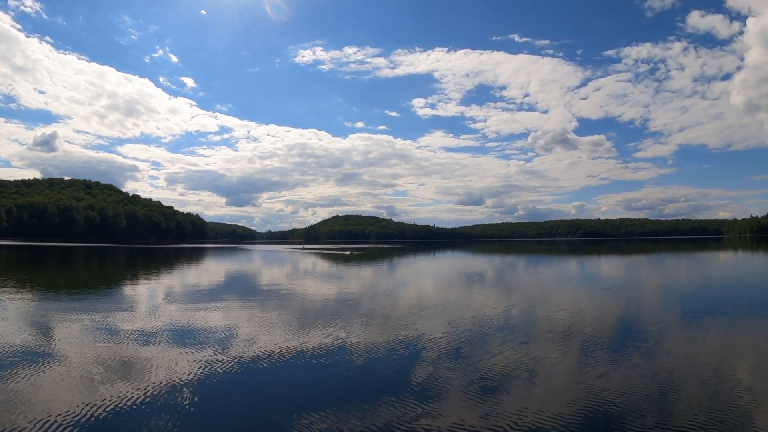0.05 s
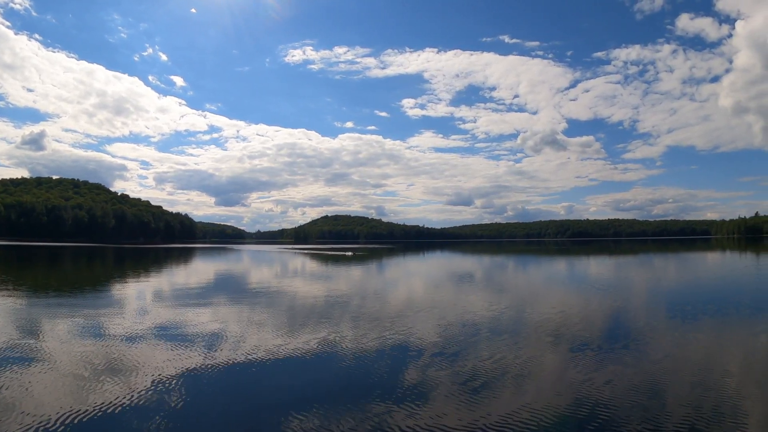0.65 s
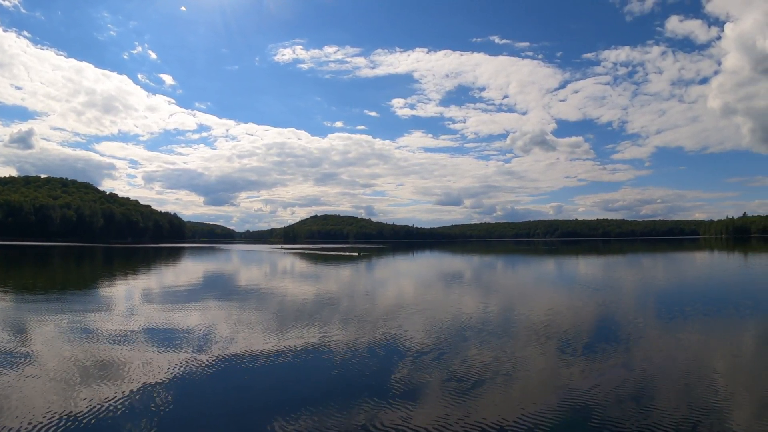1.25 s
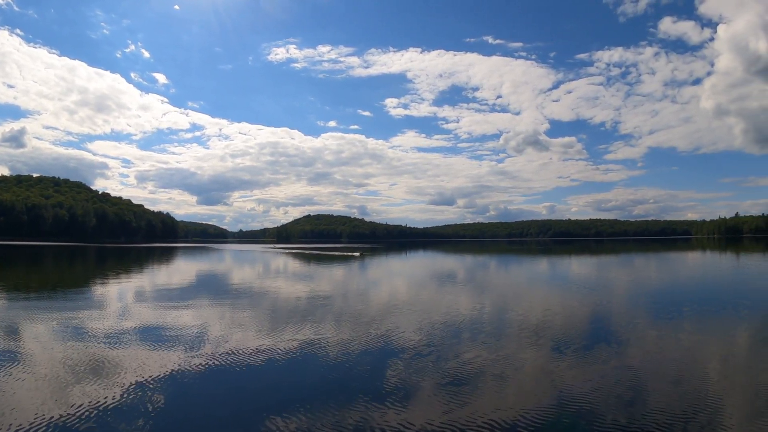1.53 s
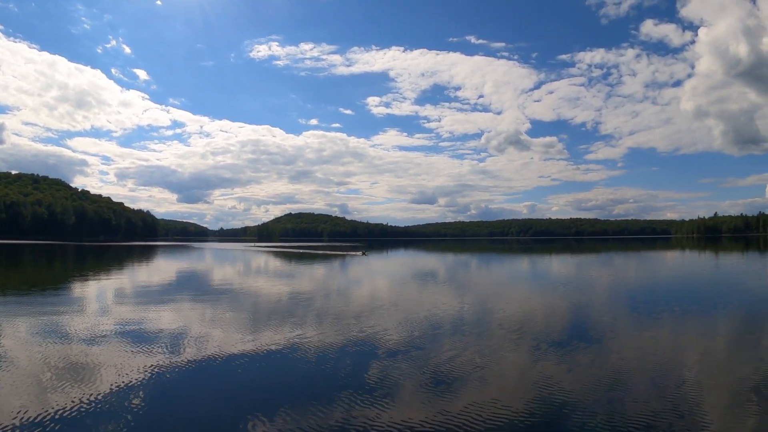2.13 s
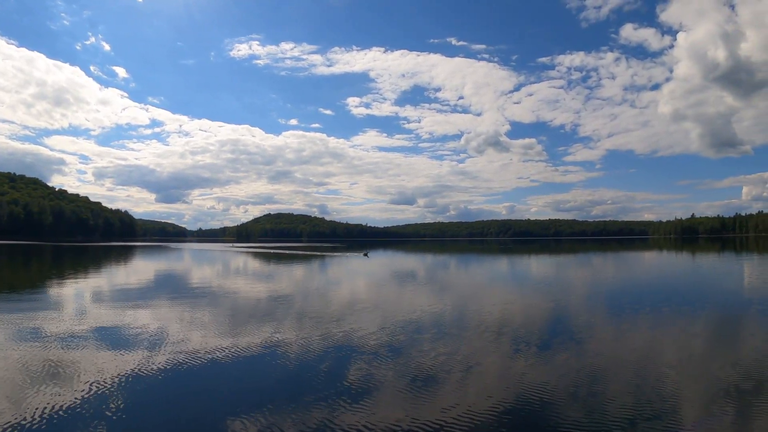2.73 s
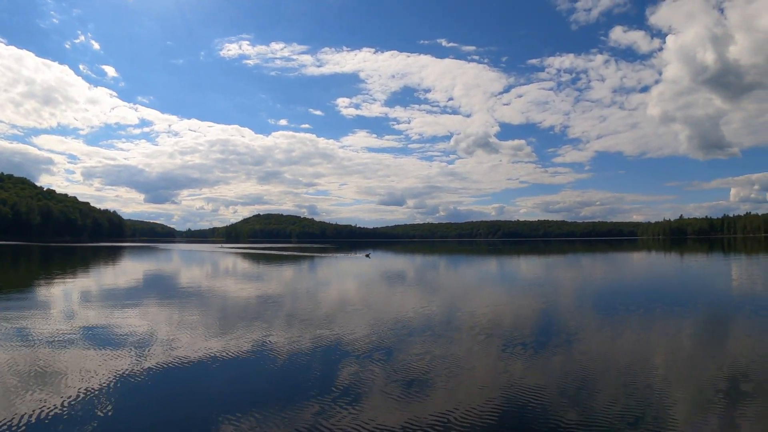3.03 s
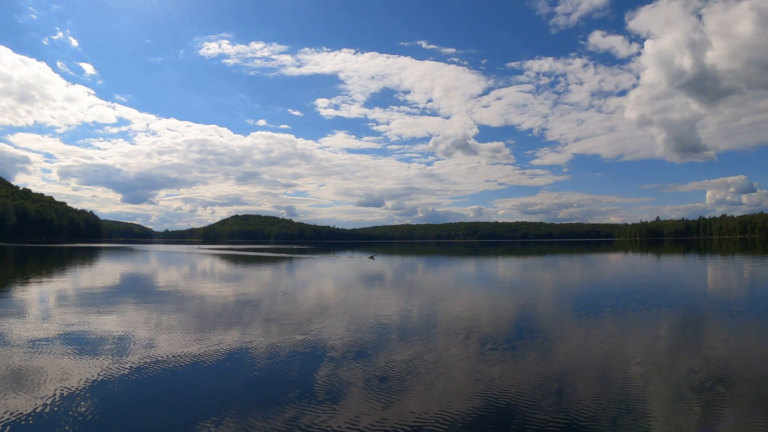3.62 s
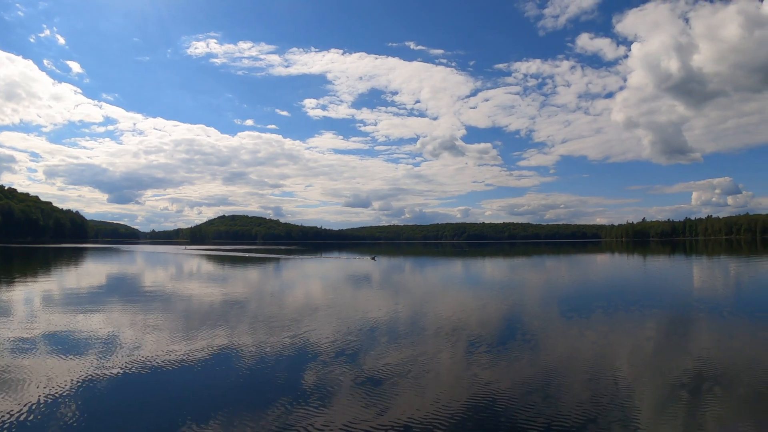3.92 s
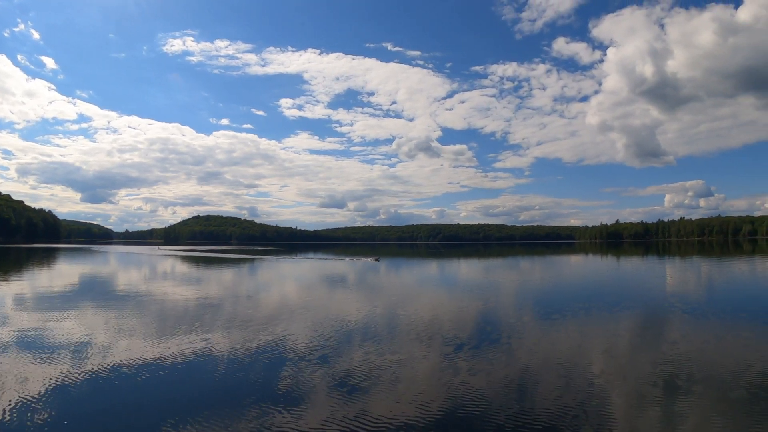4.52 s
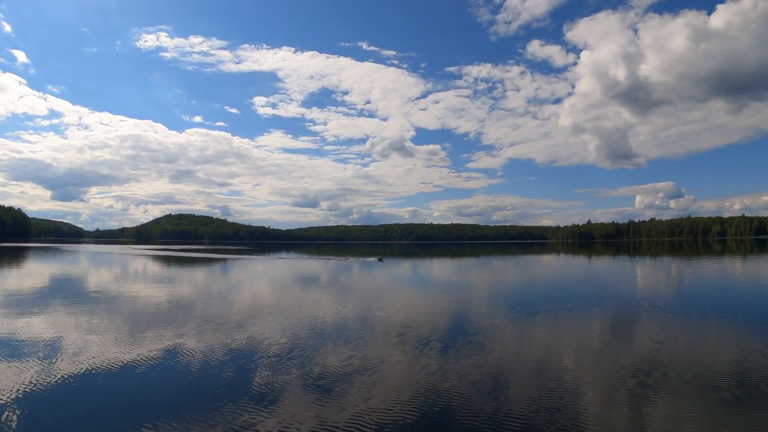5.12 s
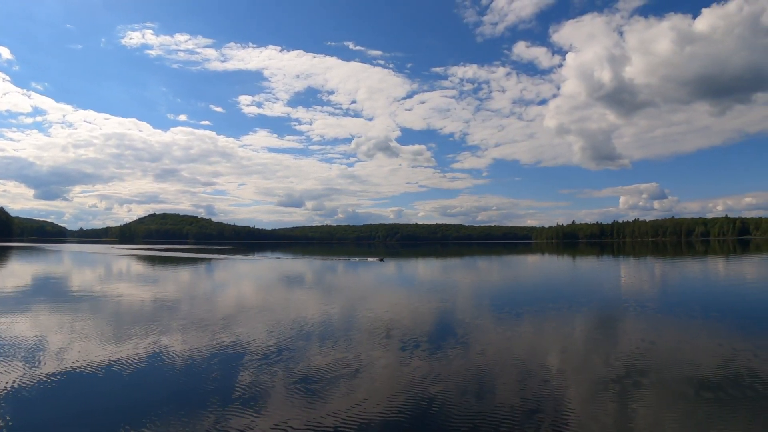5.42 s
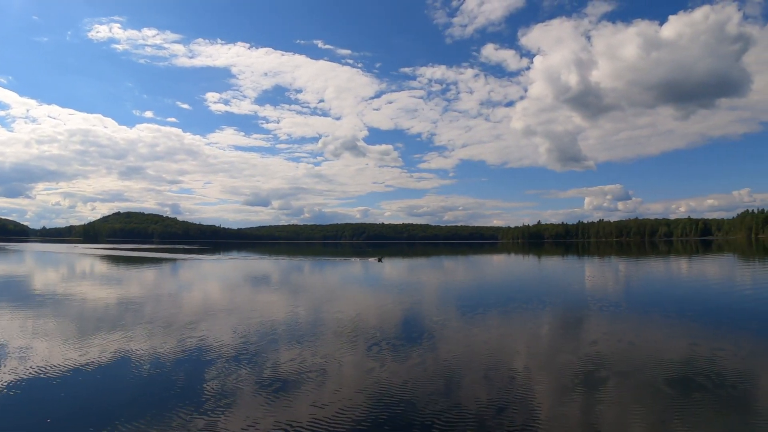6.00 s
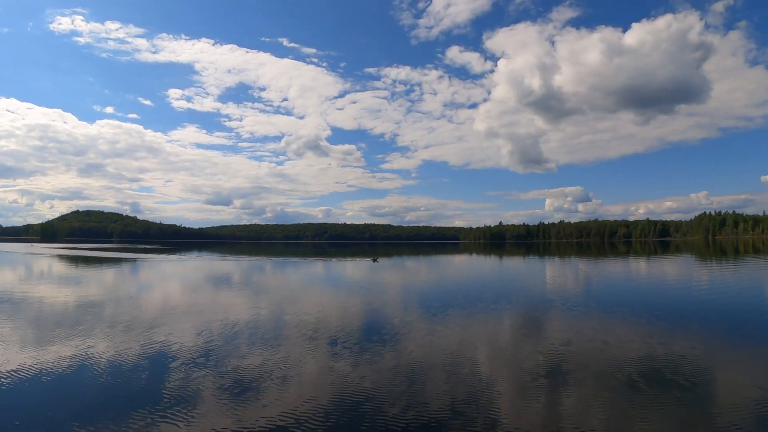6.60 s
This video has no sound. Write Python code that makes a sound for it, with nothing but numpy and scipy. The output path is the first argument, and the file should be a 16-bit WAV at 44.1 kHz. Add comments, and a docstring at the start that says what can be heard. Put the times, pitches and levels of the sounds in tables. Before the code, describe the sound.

Heard from a small drifting boat on a quiet lake, a loon gives a brief wavering call and a closer loon replies with a loud, pure tremolo. They keep taking turns, each call stepping up in pitch, quivering rapidly and dropping again. Underneath run a soft hiss of ripples, gentle lapping at the hull, scattered drips and slight puffs of air on the microphone.

```python
"""A loon's quavering call carries over a calm lake, and a nearer loon answers; the two trade tremolos.
Each voice is a nearly pure tone that swoops about ten times a second and breaks between three registers.
The wooded shore echoes faintly. Around the small drifting boat we listen from, ripples fizz,
wavelets lap at the hull, drops tick and plop, and light air nudges the microphone."""
import sys
import numpy as np
from scipy import signal
from scipy.fft import rfft, irfft
from scipy.io import wavfile
from scipy.ndimage import uniform_filter1d

SR = 44100
rng = np.random.default_rng(int(sys.argv[2]) if len(sys.argv) > 2 else 0)


def unload_wav(signal):
    """Save mono or channel-first audio to the path in sys.argv[1] as 16-bit WAV at rate SR, clipped to [-1, 1]."""
    wavfile.write(
        sys.argv[1],
        SR,
        np.round(np.clip(np.atleast_2d(signal).T, -1, 1) * 32767).astype(np.int16),
    )


N = 297675
T = np.arange(N) / SR
HZ = np.maximum(np.arange(N // 2 + 1) * SR / N, 1)


def undb(db):
    """Decibels to gain."""
    return 10 ** (np.asarray(db) / 20)


def unit(x):
    """Scale to rms 1."""
    return x / np.sqrt(np.mean(x ** 2))


def at_pitch(points, hz, column=1):
    """Read one column of a table along a log-frequency axis."""
    points = np.array(points, float)
    return np.interp(np.log(hz), np.log(points[:, 0]), points[:, column])


def colour(x, eq):
    """Filter by an EQ curve of (freq_hz, gain_db) points."""
    return irfft(rfft(x) * undb(at_pitch(eq, HZ)), N)


def walk(rate_hz):
    """Smooth random modulation of rms 1, rolling off above rate_hz."""
    return unit(irfft(rfft(rng.standard_normal(N)) * np.exp(-(HZ / rate_hz) ** 2), N))


def bump(t, centre, half_width):
    """A bell curve of height 1."""
    return np.exp(-((t - centre) / half_width) ** 2)


def swells(table, rest_db):
    """Gain of a steady bed from which each event rises and sinks again."""
    power = sum((undb(db) * bump(T, s, half)) ** 2 for s, db, half in table)
    return np.sqrt(undb(rest_db) ** 2 + power)


def add(out, start_s, x):
    """Mix x into out from a given time on."""
    i = max(int(start_s * SR), 0)
    out[i:i + len(x)] += x[:max(N - i, 0)]


def pan(x, db):
    """Place a sound by its left minus right level."""
    return x * undb(np.array([[.5], [-.5]]) * db)


# Stereo likeness of the lake bed: freq_hz, correlation
BED_LIKENESS = [(60, -0.034), (170, 0.4), (500, 0.92), (1000, 0.2), (2000, .4), (3000, 0.68), (4700, -0.55),
                (6500, 0.79), (8500, 1)]
def spread(mid, side):
    """Two unrelated noises become left and right, as alike as the water is in each band."""
    likeness = at_pitch(BED_LIKENESS, HZ)
    mid, side = rfft(mid) * np.sqrt(1 + likeness), rfft(side) * np.sqrt(1 - likeness)
    return irfft(np.array([mid + side, mid - side]), N)


# Tone of the air's rumble: freq_hz, gain_db
AIR_EQ = [(15, -0.5), (28, 4), (50, -3.5), (70, -8.5), (95, -20.5), (200, -51.5)]
# Puffs of air: centre_s, relative_level_db, half_length_s
AIR_PUFFS = [(.56, -67, 0.098), (.97, -67, .08), (1.32, -68.5, 0.12), (2.46, -71.5, 0.075),
             (3.57, -66, 0.088), (5.3, -73, 0.059), (5.75, -75.5, 0.21), (6.6, -74, 0.14)]
def breeze(gain_db):
    """Light air rumbles on the microphone in soft puffs."""
    rumble = unit(colour(spread(*rng.standard_normal((2, N))), AIR_EQ))
    return rumble * swells(AIR_PUFFS, rest_db=-80) * undb(gain_db)


def fizz(bursts_per_s=700, grain_db=1.0):
    """Tiny bursting ripples of unequal size over a smooth hiss."""
    sizes = undb(3 * np.minimum(rng.exponential(size=N), 3))
    bursts = (rng.random(N) < bursts_per_s / SR) * sizes
    splash = np.exp(-np.arange(256) / 60)
    envelope = np.sqrt(np.convolve(bursts ** 2, splash ** 2)[:N])
    grains = unit(envelope * rng.standard_normal(N))
    return rng.standard_normal(N) + undb(grain_db) * grains


# Fader ride of the fizz: time_s, relative_level_db
RIPPLE_LEVELS = [(0, -61), (.45, -63.5), (.9, -63), (1.25, -65.5), (1.87, -56.5), (2.05, -64.5), (2.2, -58),
                 (2.7, -63), (3.2, -59), (4.3, -60.5), (4.75, -58.5), (5.15, -57.5), (5.55, -62),
                 (6.3, -60), (6.75, -58.5)]
# Tone of the fizz: freq_hz, gain_db
RIPPLE_EQ = [(350, -26.5), (600, -19), (650, -10.5), (728, -14), (863, -3), (1270, 6), (1490, -3.5),
             (2370, -4), (3080, -5.5), (3420, -3), (4010, -3.5), (4640, -9.5), (5320, -10), (6910, -13.5),
             (9080, -28.5), (11800, -39), (20000, -120)]
def ripples(gain_db):
    """Ripples fizz close by, gently rising and falling."""
    level_db = np.interp(T, *np.transpose(RIPPLE_LEVELS)) + .8 * walk(12)
    return unit(colour(spread(fizz(), fizz()), RIPPLE_EQ)) * undb(level_db + gain_db)


# Tone of the gurgle: freq_hz, gain_db
LAP_EQ = [(100, -25.5), (130, -13), (160, -3), (260, -7.5), (350, -6), (480, 0), (650, 0), (900, -11),
          (1400, -40)]
# Wavelets meeting the hull: centre_s, relative_level_db, half_length_s
HULL_WAVELETS = [(.01, -54.5, 0.031), (.7, -61, 0.041), (1.02, -67, 0.082), (1.75, -70, 0.38),
                 (2.35, -63, 0.12), (2.6, -73, 0.043), (2.88, -66, 0.083), (3.25, -63.5, 0.19),
                 (3.57, -59, 0.035), (3.86, -64.5, 0.13), (4.72, -62, 0.22), (5.1, -67, 0.11),
                 (6.3, -73.5, 0.21), (6.74, -63.5, 0.098)]
def lapping(gain_db):
    """Wavelets gurgle against the hull in swells of low, unsteady noise."""
    slosh = undb(2.5 * walk(40))
    gurgle = unit(colour(spread(*rng.standard_normal((2, N))) * slosh, LAP_EQ))
    return gurgle * swells(HULL_WAVELETS, rest_db=-71.5) * undb(gain_db)


# Drops and small taps by the boat: start_s, peak_db, ring_hz
DROP_TICKS = [(.379, -36, 2200), (.528, -43, 1300), (.694, -38, 800), (1.503, -45, 3000),
              (1.594, -43, 3000), (3.856, -38, 900), (4.250, -36, 2500), (5.162, -28.5, 3000),
              (6.015, -33.5, 3200), (6.234, -33, 3000)]
def ticks(decay_s, q):
    """Each drop or tap is a brief noise burst through one broad resonance."""
    out, t = np.zeros(N), T[:SR // 8]
    soften = signal.butter(8, 7500, fs=SR, output="sos")
    for start_s, peak_db, ring_hz in DROP_TICKS:
        burst = rng.standard_normal(len(t)) * np.exp(-t / decay_s)
        ring = signal.lfilter(*signal.iirpeak(ring_hz, q, fs=SR), burst)
        tick = signal.sosfilt(soften, ring)
        add(out, start_s, undb(peak_db) * tick / np.abs(tick).max())
    return out


# Bubbles at the hull: start_s, peak_db, pitch_hz, glide_oct_per_s
HULL_PLOPS = [(.375, -48.5, 583, -6.5), (0.695, -45.5, 521, -8), (1.02, -52, 528, 7), (1.66, -56, 474, -1),
              (2.329, -50, 378, -1), (2.86, -54, 508, 3), (4.691, -47, 476, 14), (4.735, -48.5, 517, 5.5),
              (5.07, -48, 626, 1.5), (6.02, -58.5, 390, 1), (6.045, -48, 526, 4), (6.119, -47.5, 500, -1),
              (6.209, -57, 415, -5.5), (6.35, -54, 533, 17.5), (6.415, -49.5, 668, -14),
              (6.532, -58, 477, 5), (6.725, -54, 453, 10)]
def plops(rise_s, decay_s):
    """Lapping water makes bubbles that swell, glide in pitch and die."""
    out, t = np.zeros(N), T[:SR // 8]
    envelope = np.exp(-t / decay_s) * (1 - np.exp(-t / rise_s))
    for start_s, peak_db, pitch_hz, glide in HULL_PLOPS:
        phase = 2 * np.pi * np.cumsum(pitch_hz * 2 ** (glide * t)) / SR
        bubble = np.sin(phase) * envelope
        add(out, start_s, undb(peak_db) * bubble / np.abs(bubble).max())
    return out


def shore(calls, scatter_db, scatter_t60_s, forest_db, forest_t60_s, echo_db, echo_s):
    """Quick scatter off the ripples, a long faint wash from the trees and a blurred far-bank echo."""
    scatter = 1000 ** (-T / scatter_t60_s)
    forest = 1000 ** (-T / forest_t60_s) * np.minimum(T / .3, 1)
    echo = bump(T, echo_s, half_width=.1)
    returns = [(scatter_db, scatter), (forest_db, forest), (echo_db, echo)]
    power = sum(undb(db) ** 2 * shape ** 2 / np.sum(shape ** 2) for db, shape in returns)
    impulse_response = np.sqrt(power) * rng.standard_normal((2, N))
    return signal.fftconvolve(calls[None], impulse_response, axes=1)[:, :N]


# Stereo image of the birds at the two microphone ports: freq_hz, left_lag_rad, left_minus_right_db
PORT_IMAGE = [(600, .1, -6.5), (1120, .12, -4.4), (1640, 0.22, -0.5), (2760, .7, -3.5), (3720, 1.4, 2.5),
              (4380, 2.8, 3), (4630, 4.18, 4), (5230, 5.6, -5), (7000, 6.2, 2.5), (9000, 6.3, -3)]
def ports(voice):
    """A call reaches the left port slightly late, and the housing shades each band to one side."""
    lag = at_pitch(PORT_IMAGE, HZ)
    balance_db = at_pitch(PORT_IMAGE, HZ, column=2)
    left, right = undb(balance_db / 2) * np.exp(-1j * lag), undb(-balance_db / 2)
    return irfft(rfft(voice) * np.array([left, right]), N)


# Pan ride of the farther bird: time_s, left_minus_right_db
FAR_PAN = [(0, 4.5), (1.9, 3.5), (3.4, 6), (4.8, 8.5)]
def boat_turn(voice):
    """The boat turns, so the farther bird moves to the left."""
    return pan(voice, np.interp(T, *np.transpose(FAR_PAN)))


# Tone of the breath: freq_hz, gain_db
BILL_EQ = [(1500, -20.5), (2500, -6.5), (4000, 4.5), (7000, -4.5), (9000, -14), (13000, -27.5),
           (16000, -62)]
def bill_air(voice, air_db):
    """Air rushes through the open bill: a faint hiss that follows the strength of the voice."""
    strength = np.sqrt(np.abs(uniform_filter1d(voice ** 2, size=300)))
    return unit(colour(rng.standard_normal(N), BILL_EQ)) * strength * undb(air_db)


# Brightness accents for whichever bird is calling: centre_s, half_length_s, overtone_gain_db
OVERTONE_FLARES = [(0.267, 0.027, 14), (1.18, 0.044, -4), (2.528, 0.017, 6), (2.827, 0.044, 10),
                   (3.372, 0.025, 2), (3.56, 0.026, 2), (4.41, .03, 2.5), (5.295, 0.013, 5)]
def flare_db(clock):
    """The overtones flare where a bird forces its voice; a negative accent dulls them."""
    return sum(db * bump(clock, s, half) for s, half, db in OVERTONE_FLARES)


def tremolo(notes):
    """Pitch and loudness rise together in round arches; yields each note's start and control curves."""
    slowing_per_s = .204  # the quavers slow down as a note goes on
    roundness = .25  # 0 would turn the pitch in a sharp corner between quavers
    sag_oct_per_s2, sag_db_per_s2 = .9, 91.5  # each note is one shallow arch of effort
    ceiling_db, knee_db = -14.5, 1.5  # the loudest crests flatten
    attack_s, release_s, break_s = .0061, .005, .0036
    top = np.hypot(1, roundness)
    starts, ends = np.array(notes)[:, :2].T
    for start, end, crest, rate, hz, glide, swing, db, swell, dip_db, overtone_db, slope in notes:
        clock = np.arange(start, end, 1 / SR)
        t = clock - crest
        quaver = np.cos(np.pi * rate * t * (1 - slowing_per_s * t))
        dip = np.clip((top - np.hypot(quaver, roundness)) / (top - roundness), 0, 1)  # 0 on a crest
        pitch_hz = hz * 2 ** (glide * t - sag_oct_per_s2 * t ** 2 - swing * dip)
        level_db = db + swell * t - sag_db_per_s2 * t ** 2
        level_db += 20 * np.log10(1 - (1 - undb(-dip_db)) * dip)
        level_db -= knee_db * np.logaddexp(0, (level_db - ceiling_db) / knee_db)
        # each end of a note either pinches as it breaks into another register or fades away
        for moment, neighbours, fade_s in (start, ends, attack_s), (end, starts, release_s):
            joined = np.abs(neighbours - moment).min() < .005
            depth, length_s = (.5, break_s) if joined else (.9, fade_s)
            level_db += 20 * np.log10(1 - depth * bump(clock, moment, length_s))
        bright_db = overtone_db + flare_db(clock) + 1.5 - 4 * dip  # brightest on each crest
        yield start, np.array([pitch_hz, level_db, bright_db, np.full(len(t), slope)])


def syrinx(notes, throat, gain_db, overtone_db, tilt_db_per_oct, jitter, flutter_db, grain_db,
           rasp_rad, edge_s):
    """A tone with weak overtones, shaped by the throat as the pitch sweeps through its resonances."""
    out = np.zeros(N)
    waver = jitter * walk(130)
    # overtones come and go as the path over the rippled water changes, and each has a fine grain
    flutter = {k: flutter_db * walk(34) + grain_db * walk(130) for k in range(2, 12)}
    # fast unevenness of the cycles leaves a thin skirt of noise round every partial
    rasp = rasp_rad * walk(660)
    edge = int(edge_s * SR)
    for start, controls in tremolo(notes):
        controls = np.pad(controls, ((0, 0), (edge // 2, edge // 2)), mode="edge")
        # the muscles take a moment to turn, which rounds the dips
        hz, level_db, bright_db, slope = uniform_filter1d(controls, size=260, axis=1, mode="nearest")
        i = np.arange(len(hz))
        here = np.clip(int(start * SR) - edge // 2 + i, 0, N - 1)
        phase = 2 * np.pi * np.cumsum(hz * (1 + waver[here])) / SR + rasp[here]
        tone = np.sin(phase)
        for k in flutter:
            source_db = overtone_db + bright_db + (tilt_db_per_oct + slope) * np.log2(k / 2)
            throat_db = at_pitch(throat, k * hz) - at_pitch(throat, hz)
            flicker_db = flutter[k][here] * np.log((k + 1) / 2)  # the high ones flicker most
            tone += undb(source_db + throat_db + flicker_db) * np.sin(k * phase)
        ramp = np.minimum(np.minimum(i, i[::-1]) / edge, 1)
        gate = np.sin(np.pi / 2 * ramp) ** 2
        add(out, start - edge_s / 2, np.sqrt(2) * tone * gate * undb(gain_db + level_db))
    return out


# Rattles as the farther bird breaks into its top register: centre_s, half_length_s, beat_hz, depth
FAR_RATTLES = [(1.896, .04, 232, 0.28), (4.755, .035, 222, 0.36)]
def rattle(voice):
    """A slower second vibration beats against the tone and puts a side tone above and below it."""
    beat = sum(depth * bump(T, s, half) * np.sin(2 * np.pi * hz * T)
               for s, half, hz, depth in FAR_RATTLES)
    return voice * (1 + beat)


# The farther bird's notes, plus the nearer bird's faint low lead-in sounding beneath them at about 2 s.
# Each row is a stretch of tremolo in one register, with pitch and level given at the crest:
# start_s, end_s, crest_s, quavers_per_s, pitch_hz, glide_oct_per_s,
# swing_oct, relative_level_db, swell_db_per_s, dip_db, overtone_offset_db, slope_offset_db_per_oct
FAR_NOTES = [(0.05, 0.135, 0.12, 5.3, 830, 7, 0.08, -49, -2, 9.3, -15.5, -13.5),
             (0.145, 0.29, 0.18, 9.61, 971, 2.04, 0.37, -34.0, -1.5, 19.0, -16.5, -1.5),
             (0.29, 0.312, 0.294, 9.5, 1295, -4, 0.4, -39, 0.5, 3.0, -10.5, -4.0),
             (0.312, 0.333, 0.305, 8.3, 1013, -2.5, 0.29, -42.5, -1.5, 12.0, -10, -4.5),
             (0.755, 0.9, 0.76, 11, 1110, 1, 0.56, -40.5, -2.5, 14, -14, -5.5),
             (1.0, 1.12, 1.06, 9.0, 596, 2.5, 0.2, -61, -3.5, 6.0, -17, -3.5),
             (1.66, 1.703, 1.7, 14, 763, 10, 0.26, -47.5, 63, 11, 4, -10.5),
             (1.703, 1.841, 1.774, 11.37, 1140, 1.5, 0.23, -26.5, 33, 13, -11, -8),
             (1.841, 2.128, 1.973, 10.5, 1379, -0.04, 0.26, -24.5, -4, 11.0, -10, -2.5),
             (1.975, 2.22, 2.04, 8.5, 746, 1.1, 0.3, -56, 0.5, 14, 0.0, -9.5),
             (2.128, 2.23, 2.19, 9, 1103, 0.9, 0.33, -33, -4.5, 4.0, -14.5, -2.5),
             (2.175, 2.225, 2.225, 8.0, 827, 7.5, 0.11, -50.5, -1, 6.0, -1, -4.5),
             (2.22, 2.282, 2.232, 7.3, 1142, -2.5, 0.43, -41, -13.5, 9.6, -18, -3.6),
             (2.32, 2.356, 2.33, 7.5, 1115, 1, 0.32, -38, 1, 15.0, -13.5, -2.5),
             (2.38, 2.5, 2.44, 9.0, 730, 0.0, 0.25, -57.5, -4, 7.2, -15.5, -9),
             (3.105, 3.192, 3.2, 9.6, 835, 4.04, 0.25, -43.5, 78, 2.6, -4.5, -8),
             (3.192, 3.325, 3.287, 10.75, 1153, 1.4, 0.24, -27.5, 43.5, 6.7, -9.5, -4),
             (3.325, 3.715, 3.474, 10.59, 1370, -0.25, 0.24, -24.5, -11.5, 11.8, -8.5, -4.5),
             (3.715, 3.745, 3.73, 11, 913, -1.5, 0.02, -44, 1, 2.0, -18.5, 1.5),
             (3.745, 3.78, 3.754, 10.0, 600, 2.5, 0.1, -50.5, -23.5, 9.7, -13.5, -7.0),
             (4.45, 4.544, 4.475, 12.0, 665, 3, 0.22, -44.5, 3, 8.9, -4.5, -7.5),
             (4.544, 4.727, 4.655, 10.46, 1122, 0.64, 0.26, -30, 15.5, 6.6, -13.5, -1),
             (4.727, 4.99, 4.847, 10.05, 1327, 0.06, 0.23, -31, -55.5, 10.2, -8, -2)]
# Tone of the farther bird's throat and bill: freq_hz, gain_db
FAR_THROAT_EQ = [(650, -9.5), (1200, -2), (1700, -5.5), (2100, -6), (2500, -29), (2900, -36), (3400, -18),
                 (3700, -22.5), (4100, -2.5), (4750, -16), (5500, -33.5), (6700, -35), (7700, -32.5),
                 (10500, -61), (13000, -83)]
def far_loon():
    """The farther bird calls first, in a softer, raspier voice that rattles twice."""
    voice = syrinx(FAR_NOTES, FAR_THROAT_EQ, gain_db=.22, overtone_db=-1.0, tilt_db_per_oct=-3.0,
                   jitter=.0037, flutter_db=5.0, grain_db=1.5, rasp_rad=.0266, edge_s=.0029)
    return rattle(voice)


# The nearer bird's notes: start_s, end_s, crest_s, quavers_per_s, pitch_hz, glide_oct_per_s,
# swing_oct, relative_level_db, swell_db_per_s, dip_db, overtone_offset_db, slope_offset_db_per_oct
NEAR_NOTES = [(0.5, 0.607, 0.553, 8.8, 1450, 1, 0.32, -49, 0.5, 15, -11.5, -9.5),
              (0.5, 0.61, 0.555, 12, 622, 1, 0.012, -52, 1, -1.5, -12.5, -10.5),
              (0.625, 0.755, 0.662, 10.4, 760.0, 1, 0.29, -57, -2, 15, 5, -11.5),
              (0.772, 0.896, 0.792, 9.7, 799.4, 3.0, 0.26, -33.5, 129, 12, -5, -2),
              (0.896, 1.082, 0.994, 10.2, 1305, 0.6, 0.28, -12, 8, 17, -11, -4.0),
              (1.082, 1.433, 1.191, 9.93, 1579, -0.11, 0.21, -22, -4, 12, -5, -2),
              (1.433, 1.485, 1.412, 8.6, 1128, -0.6, 0.17, -25, -72.5, 5.5, -9.5, -5.5),
              (1.485, 1.503, 1.47, 12, 767, 0.5, 0.24, -43.5, -100.0, 0.5, -6, -6.0),
              (2.283, 2.355, 2.324, 8, 881, 1.86, 0.3, -28.5, 51, 9, -4.5, -3.5),
              (2.355, 2.503, 2.411, 9.8, 1279, 0.63, 0.27, -12, 10, 14, -11.5, -1.5),
              (2.503, 2.877, 2.612, 9.9, 1595, -0.08, 0.24, -21, 1.5, 11.5, -7, -4.5),
              (2.877, 2.972, 2.857, 10.7, 1018, -0.2, 0.11, -25, -116.0, 3, -20.5, 0.5),
              (2.972, 3.0, 2.957, 9.8, 760, 0.2, 0.22, -45.5, -22, 18, -1, -6.0),
              (3.862, 3.915, 3.902, 11.2, 883, 8, 0.029, -27.5, 163.5, 9, -1.3, -3.5),
              (3.915, 4.102, 4.006, 9.98, 1279, 0.46, 0.28, -15, 0, 9.0, -10.5, -3.5),
              (4.102, 4.361, 4.208, 9.87, 1559, -0.22, 0.2, -20.5, -18.5, 12.5, -13, -4),
              (4.361, 4.485, 4.43, 9.3, 1163.0, -1.1, 0.27, -21, -49.5, 12.5, -9, -4.5),
              (5.255, 5.367, 5.284, 9.45, 857.5, 3.55, 0.3, -29, 143, 8.5, -5.5, -0.5),
              (5.367, 5.688, 5.487, 10.3, 1313, 0.17, 0.25, -11, -2, 9.5, -12.5, -1.3),
              (5.688, 5.838, 5.795, 9.45, 1542, -0.53, 0.24, -25, -34, 11, -3.1, -6),
              (5.838, 5.955, 5.911, 10.9, 1044, -0.86, 0.073, -27.5, -74, 4.5, -17.2, 1)]
# Tone of its throat and bill: freq_hz, gain_db
NEAR_THROAT_EQ = [(650, -6.5), (1200, 0.5), (1700, -3.5), (2100, -18.5), (2500, -15), (2900, -27),
                  (3400, -13.5), (3700, -15), (4100, -7), (4750, -27), (5500, -22), (6700, -31),
                  (7700, -30.5), (10500, -54.5), (13000, -77)]
def near_loon():
    """The nearer bird answers loud and clean, with a trace of breath."""
    voice = syrinx(NEAR_NOTES, NEAR_THROAT_EQ, gain_db=.36, overtone_db=1.0, tilt_db_per_oct=-2.5,
                   jitter=.0024, flutter_db=3.5, grain_db=2.5, rasp_rad=.00316, edge_s=.004)
    return voice + bill_air(voice, air_db=-42.5)


def scene():
    """The lake bed, drops and shore echoes, with both birds on top."""
    near, far = near_loon(), far_loon()
    birds = pan(ports(near), db=2.5) + boat_turn(ports(far))
    echoes = shore(near + far, scatter_db=-19.5, scatter_t60_s=.078, forest_db=-52, forest_t60_s=3,
                   echo_db=-41, echo_s=2.2)
    bed = breeze(gain_db=6) + ripples(gain_db=10.5) + lapping(gain_db=4)
    drops = ticks(decay_s=.0077, q=.69) + plops(rise_s=.00082, decay_s=.018)
    return bed + drops + echoes + birds


def record(dry):
    """A steep low-pass cuts the highest treble."""
    top_hz = 13500
    return signal.sosfilt(signal.ellip(8, .2, 70, top_hz, fs=SR, output="sos"), dry)


dry = scene()
out = record(dry)
unload_wav(out)
```